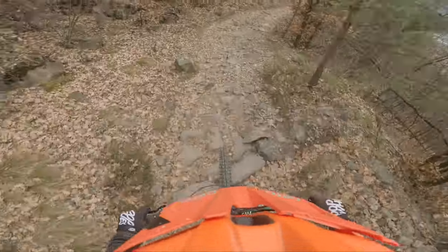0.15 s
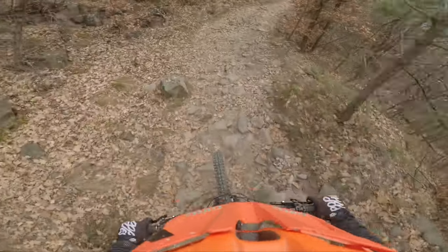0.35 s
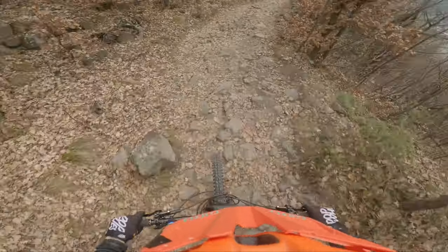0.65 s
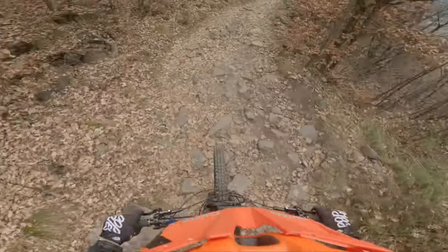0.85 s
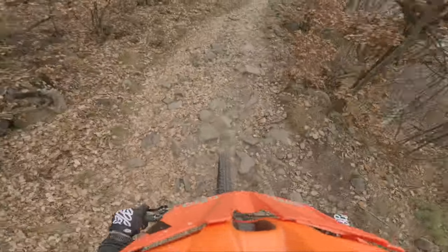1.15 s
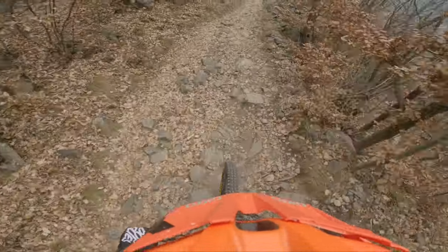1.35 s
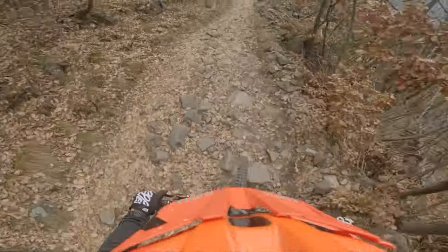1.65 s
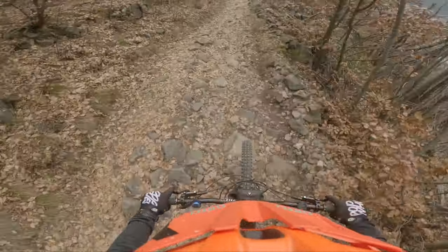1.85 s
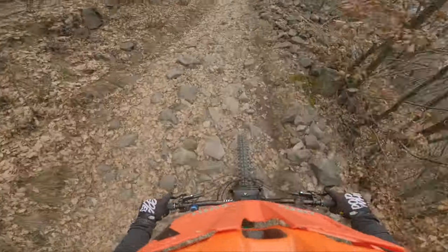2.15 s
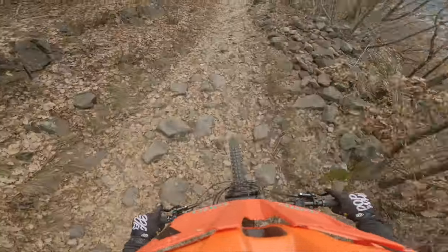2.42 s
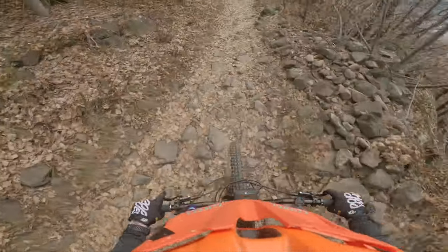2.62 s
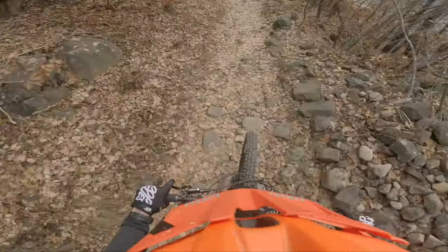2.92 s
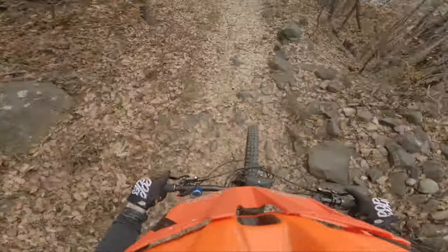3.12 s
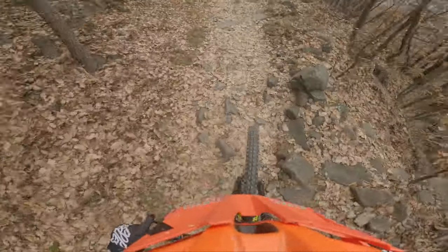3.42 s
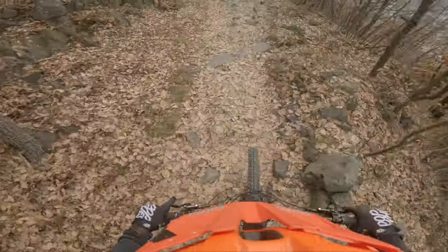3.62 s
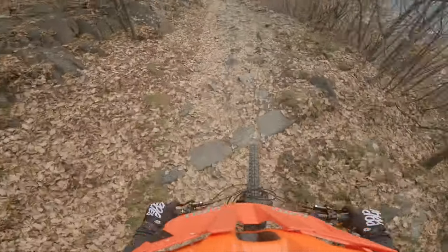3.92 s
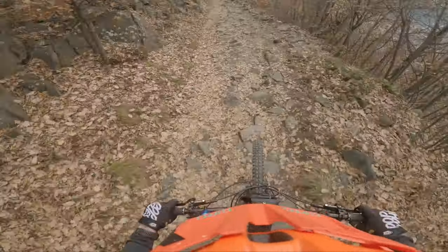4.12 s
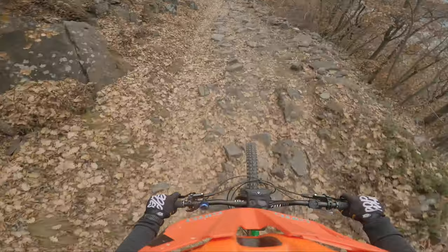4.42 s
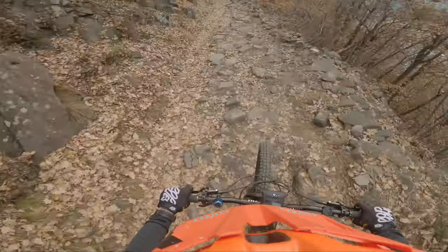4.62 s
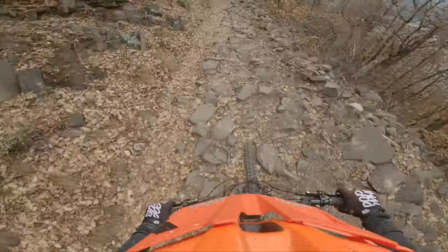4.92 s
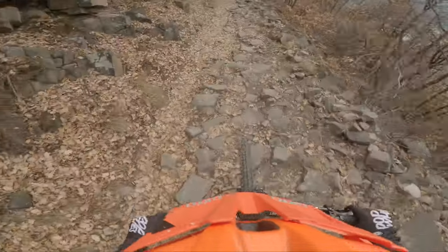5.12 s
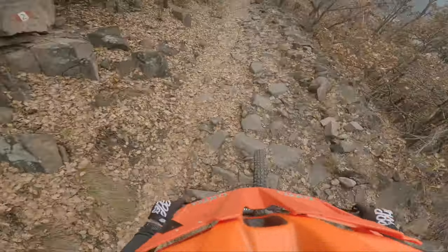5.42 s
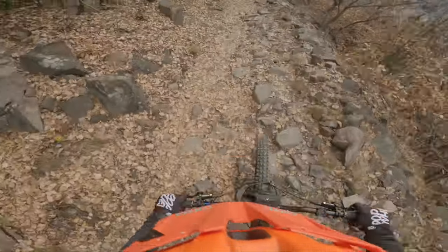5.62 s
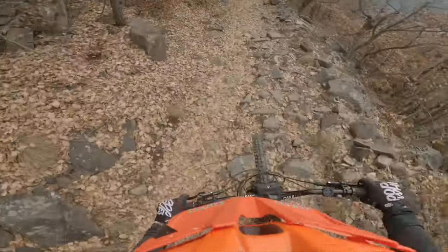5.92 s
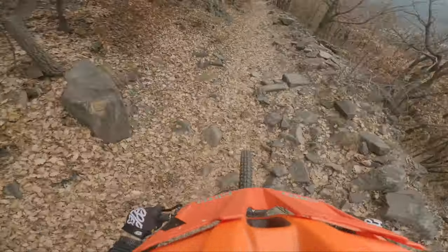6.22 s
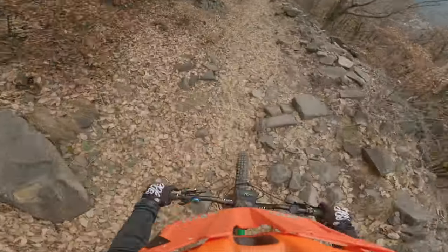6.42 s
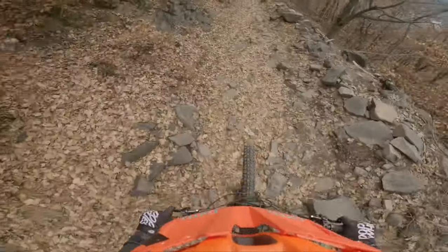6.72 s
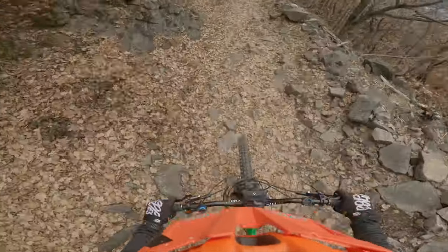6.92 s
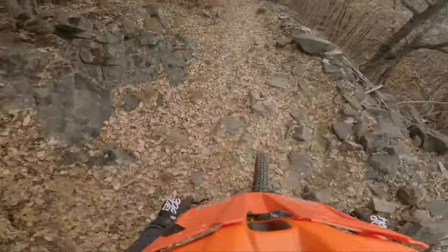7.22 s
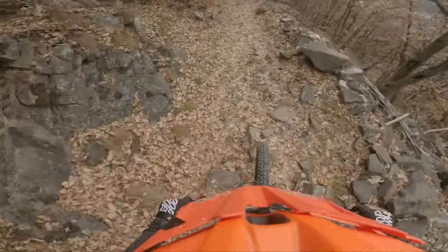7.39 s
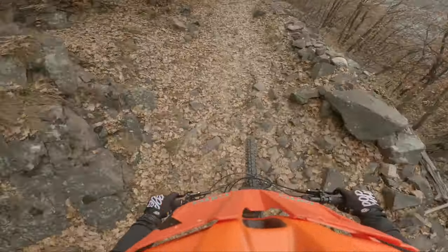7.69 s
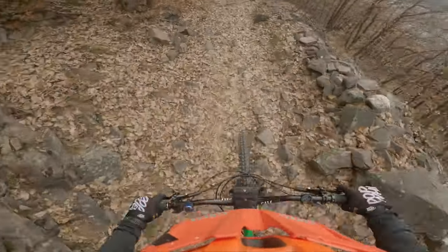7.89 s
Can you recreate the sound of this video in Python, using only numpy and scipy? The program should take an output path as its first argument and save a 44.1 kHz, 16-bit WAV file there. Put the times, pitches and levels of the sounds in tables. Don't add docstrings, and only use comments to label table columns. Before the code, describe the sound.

Heard from a rider's helmet, a mountain bike descends a rocky trail in leafless woods. Knobby tyres crunch grit and dry leaves in uneven clumps. Loose parts clack on the frame several times a second, stones knock hollowly, the slack chain clicks and rings thinly. Low wind pushes and flutters on the microphone, strongest after the middle. Close, dry outdoor sound with almost no echo.

```python
import sys
import numpy as np
from scipy import signal
from scipy.fft import rfft, irfft, next_fast_len
from scipy.io import wavfile
from scipy.ndimage import uniform_filter1d, map_coordinates

SR = 44100
rng = np.random.default_rng(int(sys.argv[2]) if len(sys.argv) > 2 else 0)


def linear_from_db(decibels):
    return 10 ** (np.asarray(decibels, float) / 20)


def inscribe(sig):
    pcm = np.round(np.clip(np.atleast_2d(sig).T, -1, 1) * 32767)
    wavfile.write(sys.argv[1], SR, pcm.astype(np.int16))


N = 355137


def unit(x):
    return x / np.sqrt(np.mean(x ** 2) + 1e-20)


def along(points, hz):
    f, v = np.transpose(points)
    return np.interp(np.log(hz + 1), np.log(f + 1), v)


def curves(rows):
    s, *cols = np.transpose(rows)
    return [np.interp(np.arange(N) / SR, s, c) for c in cols]


def swells(rows):
    t = np.arange(N) / SR
    tracks = np.zeros((len(rows[0]) - 2, N))
    for s, half_s, *db in rows:
        first = max(round((s - 4 * half_s) * SR), 0)
        near = slice(first, round((s + 4 * half_s) * SR))
        bell = np.exp(-((t[near] - s) / half_s) ** 2 / 2)
        tracks[:, near] += np.outer(db, bell)
    return tracks


def wobble(rate):
    knots = rng.standard_normal(int(N * rate / SR) + 4)
    return map_coordinates(knots, [np.arange(N) * rate / SR])


def coloured(x, spectrum):
    m = 2 * next_fast_len(N // 2 + 4096)
    gain = linear_from_db(along(spectrum, np.fft.rfftfreq(m, 1 / SR)))
    cep = irfft(np.log(gain + 1e-6), m)
    cep[1:m // 2] *= 2
    cep[m // 2 + 1:] = 0
    return unit(irfft(rfft(x, m) * np.exp(rfft(cep)), m)[:N])


def even(x, span_s):
    power = uniform_filter1d(x ** 2, size=round(span_s * SR))
    return unit(x / np.sqrt(np.abs(power) + 1e-9))


def patchy(x, depth_db):
    z = signal.stft(x, nperseg=256)[2]
    field = uniform_filter1d(rng.standard_normal(z.shape), size=5, axis=0)
    field = uniform_filter1d(field, size=7, axis=1)
    return unit(signal.istft(z * linear_from_db(depth_db * unit(field)), nperseg=256)[1][:N])


def grains(rate, centre_hz, octaves, cycles, spread_db):
    when, pitch, size = rng.random((3, int(rate * N / SR), 1))
    hz = centre_hz * 2 ** (octaves * (2 * pitch - 1))
    k = np.arange(96)
    turns = hz * k / SR
    ring = np.sin(2 * np.pi * turns) * np.exp(-turns / cycles)
    onset = 1 - np.exp(-10 * turns)
    wave = ring * onset * linear_from_db(-spread_db * np.log(size + 0.07))
    place = (when * N).astype(int) + k
    return unit(np.bincount(place.ravel(), wave.ravel(), minlength=N)[:N])


def add(track, s, sound):
    part = track[round(s * SR):][:len(sound)]
    part += sound[:len(part)]


def contact(length_s, rattle, rattle_s):
    t = np.arange(SR // 16) / SR
    wait, weaker = rng.random(2)
    since_bounce = np.abs(t - 0.003 - 0.0034 * wait)
    rough = 0.5 * np.exp(-t / length_s)
    rough += 0.47 * weaker * np.exp(-since_bounce / length_s)
    rough += rattle * np.exp(-t / rattle_s)
    return 0.83 * (t == 0) + rough * rng.standard_normal(len(t)) / np.sqrt(length_s * SR)


def resonate(x, modes, soft_hz):
    m = next_fast_len(len(x) + 2048)
    f = np.fft.rfftfreq(m, 1 / SR)
    body = 0
    for k, (hz, wide, db) in enumerate(modes):
        body = body + (-1) ** k * linear_from_db(db) * 1j * f / (hz * hz - f * f + 1j * f * wide)
    softened = body / (1 + 1j * f / soft_hz) ** 3
    return irfft(rfft(x, m) * softened * SR / (2 * np.pi), m)[:len(x)]


def struck(modes):
    scatter_db = 2.8
    return [(hz, wide, db + scatter_db * rng.standard_normal()) for hz, wide, db in modes]


def shaking(hits, rise_s, fall_s):
    load = np.zeros(N)
    t = np.arange(SR // 8) / SR
    for s, db, *_ in hits:
        add(load, s, linear_from_db(db + 11.0) * np.minimum(t / rise_s, 1) * np.exp(-t / fall_s))
    return load


# f/Hz, level/dB (per Hz)
GRIT_COLOUR = [(210, -10), (350, 0.5), (791, -5), (1110, 1.5), (1590, -0.5), (1920, -5), (2410, -1.5),
               (3650, -11), (4930, -24), (7000, -49), (9100, -56), (15400, -120)]
# f/Hz, level/dB (per Hz)
LEAF_COLOUR = [(1500, -21.5), (3500, -4), (5000, -2), (6500, -8), (8300, -10.5), (8900, -18),
               (11500, -24.5), (13500, -42), (15500, -89)]
# t/s, crunch level/dB, leaf level/dB (against the crunch)
GROUND_COVER = [(0.0, -31.5, -25.5), (0.73, -32, -23.5), (1.46, -28, -22.5), (2.2, -31.5, -24),
                (2.93, -26, -22), (3.66, -27.5, -22), (4.39, -32, -22), (5.12, -31.5, -24.5),
                (5.85, -29.5, -21.5), (6.59, -27.5, -21), (7.32, -30, -22), (8.05, -28, -18.5)]
# t/s, half length/s, change/dB
LOOSE_PATCHES = [(0.055, 0.018, 7.5), (0.394, 0.01, 6), (0.539, 0.03, -6.5), (0.913, 0.015, 2.5),
                 (1.093, 0.015, -2.5), (1.202, 0.011, -12), (1.402, 0.01, -11), (1.916, 0.061, 1),
                 (2.025, 0.025, 4), (2.544, 0.014, -4.5), (2.943, 0.042, -4), (3.083, 0.08, -5.5),
                 (3.432, 0.016, -8), (4.086, 0.018, 7), (4.46, 0.013, 2), (4.664, 0.028, 4),
                 (5.158, 0.0087, -5), (5.627, 0.027, 3), (5.832, 0.037, -8), (6.066, 0.0089, -9),
                 (6.246, 0.017, -6.5), (6.376, 0.017, -5.5), (6.575, 0.023, -13), (6.71, 0.015, -6),
                 (6.854, 0.018, -10.5), (6.914, 0.0068, -10), (7.089, 0.014, -15.5), (7.862, 0.042, -5)]
# t/s, change/dB
CRUNCH_RIPPLES = [(3.883, 0), (0.154, 5), (0.424, 7), (0.543, 4), (0.618, 1), (0.964, -3.5), (1.072, -8),
                  (3.163, 7), (1.281, -5), (1.482, -2.5), (1.521, -10.5), (1.704, -7), (1.869, -1.5),
                  (1.965, 5), (2.163, -5), (4.378, -4.5), (3.03, 0), (3.409, -3), (3.569, 2), (3.639, -11),
                  (3.819, 0), (4.001, -4), (4.085, -2), (4.259, -0.5), (4.303, 4), (4.426, 5), (4.491, -7),
                  (4.547, -2), (4.8, 2.5), (4.768, -6), (4.838, -6), (4.971, 3.5), (5.27, -4), (5.372, -1),
                  (5.511, -1.5), (5.566, 0), (5.669, -11), (5.041, 0), (6.495, -8), (6.635, -6.5),
                  (6.795, 1.5), (7.014, -3.5), (7.157, -4), (7.334, 3.5), (7.466, 0.5), (7.737, 1),
                  (7.844, 5), (7.895, 3), (8.011, 0)]
# t/s, change/dB
LEAF_RUSTLES = [(0.28, 11), (0.574, 11), (0.815, 6), (0.952, 13), (1.864, 6), (3.161, 3), (4.124, 8),
                (4.674, 11.5), (5.184, 7), (7.577, 7), (7.976, 8)]


def tyres(dull):
    load = shaking(dull + STONE_THUMPS + PEBBLE_HITS, rise_s=0.0015, fall_s=0.014)
    clump_db = 1.87 * wobble(25) + 1.9 * wobble(80)

    hiss = patchy(coloured(rng.standard_normal(N), GRIT_COLOUR), depth_db=3.0)
    stones = grains(700, centre_hz=1610, octaves=1.26, cycles=1.7, spread_db=4.5)
    grit = even(linear_from_db(clump_db) * (hiss + 0.68 * stones), span_s=0.089)

    snaps = grains(1500, centre_hz=7900, octaves=1.74, cycles=1.0, spread_db=-4.0)
    crackle = coloured(rng.standard_normal(N) + 0.51 * snaps, LEAF_COLOUR)
    leaves = unit(linear_from_db(0.89 * clump_db + 2.2 * wobble(30)) * crackle)

    crunch_db, cover_db = curves(GROUND_COVER)
    ripples = [(s, 0.0082, db) for s, db in CRUNCH_RIPPLES]
    patch_db, = swells(LOOSE_PATCHES + ripples)
    rustle_db, = swells([(s, 0.004, db) for s, db in LEAF_RUSTLES])
    near_leaves = linear_from_db(0.83 * patch_db + rustle_db)
    cover = (near_leaves + 0.28) * (1 + 0.15 * load)

    grit_level = linear_from_db(crunch_db + patch_db - 3.0) * (1 + 1.38 * load)
    return grit_level * grit + linear_from_db(crunch_db + cover_db + 4) * cover * leaves


# t/s, level/dB
AIRFLOW = [(0.0, -29.5), (0.89, -26.5), (1.79, -28.5), (2.68, -24.5), (3.58, -27), (4.47, -18.5),
           (5.37, -19), (6.26, -24.5), (7.16, -24), (8.05, -26)]
# f/Hz, level/dB (per Hz)
BUFFET_COLOUR = [(10, -13), (30, -1), (60, 2.5), (110, -4), (170, -17), (300, -37.5), (700, -73.5)]
# f/Hz, level/dB (per Hz)
FLUTTER_COLOUR = [(60, -11), (120, 2.5), (220, -3), (330, -12.5), (500, -26), (900, -38), (2000, -99)]
# t/s, half length/s, push/dB, flutter/dB
WIND_GUSTS = [(0.08, 0.022, 7, 14), (0.683, 0.014, 9.5, 9.5), (0.738, 0.012, -13, -15),
              (0.793, 0.072, 7.5, 14), (0.988, 0.082, -4.5, -2), (1.217, 0.019, 5.5, 15),
              (1.541, 0.031, -5.5, -2.5), (1.866, 0.017, -22, -2), (2.03, 0.022, -15, 6.5),
              (2.684, 0.041, -9, -0.5), (2.948, 0.04, -4, -0.5), (3.751, 0.027, -8, 6),
              (3.841, 0.027, -12, 0), (4.071, 0.026, 4, 8), (4.185, 0.024, 3.5, 14.5),
              (5.098, 0.024, -10, -10), (5.198, 0.029, -8, -8.5), (5.557, 0.096, 2, -12),
              (5.687, 0.021, -3.5, -15), (5.802, 0.084, -1, 7), (6.016, 0.014, -6, -11),
              (6.221, 0.027, 5.5, 1), (6.346, 0.014, 6.5, 16.5), (6.62, 0.022, 3.5, 5),
              (6.944, 0.04, 5.5, 6), (7.019, 0.037, -11, -7), (7.423, 0.024, -4, -11), (7.603, 0.021, 5, 7)]
# t/s, push/dB, flutter/dB
WIND_EDDIES = [(0.112, 0, -9), (0.62, -7, -8), (0.895, 5.5, 8), (0.959, -3, -10), (1.443, 0, 13),
               (1.496, -8, 4), (1.69, 2.5, -6), (1.762, -7, 9), (2.116, 5.5, 6), (2.243, -2, 9),
               (2.294, -1.5, 7.5), (2.472, -12, 0), (4.415, -5, 7.5), (2.775, 4.5, 7), (7.07, 1, 7),
               (3.618, -13, 5), (3.78, 11, -11), (3.976, -10, 3), (4.325, -7, 5.5), (4.499, 0, -4.5),
               (4.636, -3, 7.5), (4.747, -6, 1.5), (4.92, -4, 8), (5.22, 5, 6), (5.459, -4, 13),
               (5.609, -2, 8.5), (5.785, 4, 1), (5.86, 3.5, -13), (5.928, 3, 5), (6.219, -3, 9),
               (6.482, 0.5, -1), (6.842, 1.5, -2), (6.97, -9, 2), (7.14, 8.5, -1), (7.294, 3.5, -18),
               (7.549, 8, -5), (7.685, 5.5, -7), (7.835, 6, 4.5), (7.95, 5.5, -12), (8.048, 2.5, -7)]


def wind():
    air_db, = curves(AIRFLOW)
    mean_db = air_db.mean()
    eddies = [(s, 0.012, push, whip) for s, push, whip in WIND_EDDIES]
    push_db, whip_db = swells(WIND_GUSTS + eddies)
    lumps = wobble(16)
    buffet = linear_from_db(1.04 * lumps) * coloured(rng.standard_normal(N), BUFFET_COLOUR)
    buffet = even(buffet, span_s=0.15)
    flutter = linear_from_db(1.3 * lumps + 3.8 * wobble(35)) * coloured(rng.standard_normal(N), FLUTTER_COLOUR)
    flutter = even(flutter, span_s=0.16)
    buffet_db = mean_db + 0.76 * (air_db - mean_db) + push_db + 0.6
    flutter_db = -31 + 1.13 * (air_db - mean_db) + whip_db
    return linear_from_db(buffet_db) * buffet + linear_from_db(flutter_db) * flutter


# t/s, dull level/dB, hard level/dB
FULL_STRIKES = [(1.049, -17, -34), (1.223, -14.5, -29), (1.6834, -11, -20.5), (1.7447, -18.5, -26),
                (1.766, -16, -23), (2.073, -13, -21), (2.1153, -18, -38), (2.2035, -22, -31.5),
                (2.423, -18, -20.5), (2.7518, -17, -39), (3.1723, -15.5, -27), (3.27, -19, -32.0),
                (3.2956, -33, -19), (3.3942, -15, -42), (3.5157, -14, -30), (3.6236, -13, -20),
                (3.71, -15, -41), (3.7754, -18, -25), (3.8293, -20, -37), (4.459, -15.5, -17.5),
                (5.93, -25, -30), (6.4287, -12, -20), (6.4708, -17, -18), (6.5429, -8, -21),
                (7.0634, -10.5, -26), (7.283, -20, -45), (7.375, -17.5, -26), (7.589, -17.5, -21),
                (7.9382, -19, -24.5), (7.978, -16, -27)]
# t/s, peak level/dB
DULL_CLACKS = [(0.1, -18), (0.3788, -19), (0.7163, -18), (0.9825, -17.5), (1.1853, -12), (1.833, -21),
               (2.05, -15), (2.131, -16.5), (2.489, -12), (2.5772, -17), (2.667, -13), (2.848, -16.5),
               (2.975, -16), (3.107, -15.5), (4.5575, -23), (4.076, -15.5), (4.1614, -20), (4.939, -20),
               (5.359, -10), (5.4686, -17.5), (5.645, -14.5), (6.1304, -17.5), (6.183, -18.5),
               (6.2724, -17.5), (6.5306, -14), (6.619, -16.5), (6.696, -15), (6.7645, -17), (6.8322, -12.5),
               (6.953, -16.5),
               (0.357, -17.5), (0.607, -18.5), (0.6787, -21), (0.826, -24), (0.93, -28), (1.4333, -21),
              (1.582, -19), (1.665, -16.5), (2.348, -21), (2.396, -21), (3.338, -22.5), (4.6565, -20),
              (4.722, -17.5), (4.819, -23), (4.9038, -24), (5.297, -23), (5.439, -19), (5.913, -17),
              (6.0856, -23), (7.1057, -18), (7.164, -24), (7.267, -29)]
# t/s, peak level/dB
HARD_SNAPS = [(0.0199, -32), (0.342, -32), (0.4904, -26), (1.1857, -28), (1.3833, -29), (1.497, -22),
              (1.5505, -25), (1.608, -19.5), (2.0137, -24.5), (2.1382, -16.5), (0.2125, -31),
              (2.2536, -27.5), (2.805, -20.5), (3.1073, -20), (3.9537, -22.5), (4.3243, -28.5),
              (4.9423, -23), (5.22, -23.5), (5.615, -23), (5.6441, -31), (5.733, -24), (5.85, -34),
              (5.899, -21.5), (6.004, -27), (6.324, -19.5), (6.5974, -24), (6.771, -23.5), (7.1333, -21.5),
              (7.177, -29), (7.912, -32)]


def strikes():
    knocks = [(s, db + 1.0) for s, db, *_ in FULL_STRIKES + DULL_CLACKS]
    return knocks + [(s, db + 4) for s, db in HARD_SNAPS]


# f/Hz, width/Hz, level/dB
FRAME_MODES = [(1500, 480, -2), (2370, 177, 0.5), (2750, 320, 4), (3330, 560, 1.5)]
# f/Hz, width/Hz, level/dB
FRAME_TOP_MODES = [(3944, 200, -1), (5350, 600, -0.5), (7500, 2500, -30)]


def clacks(dull):
    track = np.zeros(N)
    for s, db in dull:
        blow = contact(0.0011, rattle=0.32, rattle_s=0.0053)
        knock = resonate(blow, struck(FRAME_MODES), soft_hz=3850)
        add(track, s, linear_from_db(db) * knock / np.abs(knock).max())
    for s, db in HARD_SNAPS + [(s, db + 1.0) for s, _, db in FULL_STRIKES]:
        blow = contact(0.00037, rattle=0.24, rattle_s=0.0013)
        snap = resonate(blow, struck(FRAME_TOP_MODES), soft_hz=5150)
        add(track, s, linear_from_db(db + 2.0) * snap / np.abs(snap).max())
    return track


# t/s, peak level/dB
TWIG_SNAPS = [(0.0199, -16), (0.0997, -17), (0.7177, -9), (0.847, -21), (0.8654, -17), (0.931, -15.5),
              (1.771, -11), (1.7953, -18), (1.8315, -11.5), (2.178, -20), (2.676, -13), (2.7508, -13),
              (3.6521, -17), (3.7559, -11), (3.8302, -6), (5.7468, -15), (5.8102, -20), (5.9309, -11),
              (6.12, -11), (7.4245, -13), (7.9194, -14)]
# f/Hz, width/Hz, level/dB
TWIG_MODES = [(3000, 450, 1.5), (5440, 2500, -8)]


def twigs():
    track = np.zeros(N)
    t = np.arange(SR // 100) / SR
    for s, db in TWIG_SNAPS:
        crack = np.exp(-t / 0.00047) * rng.standard_normal(len(t))
        click = resonate(crack, TWIG_MODES, soft_hz=6000)
        add(track, s, linear_from_db(db - 5) * click / np.abs(click).max())
    return track


# t/s, peak level/dB, f/Hz
STONE_THUMPS = [(0.04, -19.5, 950), (0.38, -22, 950), (0.682, -16.5, 1250), (0.827, -17, 1250),
                (0.899, -16, 1080), (1.058, -12, 1010), (1.13, -20.5, 1200), (1.235, -20, 1050),
                (1.5, -21, 1420), (1.897, -16.5, 1380), (2.253, -17.5, 1000), (2.577, -20, 1170),
                (2.636, -19.5, 1490), (3.037, -9, 1040), (3.254, -17, 1200), (3.344, -17, 1170),
                (3.7565, -17, 1000), (4.036, -19, 1110), (4.636, -17.5, 980), (4.983, -13.5, 1060),
                (5.229, -18.5, 1080), (5.649, -16, 1210), (5.724, -20, 1110), (5.841, -18, 1020),
                (6.089, -14, 890), (6.474, -20, 1100), (6.617, -17, 1370), (6.947, -15.5, 1070),
                (7.696, -18, 1190), (7.776, -18.5, 1070)]
# t/s, peak level/dB
WHEEL_DROPS = [(0.68, -19.5), (0.767, -14), (1.302, -18), (2.028, -17.5), (3.268, -21.5), (3.755, -13),
               (4.158, -18), (4.21, -11), (4.684, -16), (4.803, -21), (5.33, -20), (5.794, -13.5),
               (6.338, -23)]
# f/Hz, width/Hz, level/dB
FORK_MODES = [(127, 210, -3), (260, 78, 2.5), (560, 520, 3), (880, 590, -3)]


def thumps():
    track, drops = np.zeros((2, N))
    for s, db, hz in STONE_THUMPS:
        shell = [(0.25 * hz, 300, -9), (hz, 300, 2.5), (1.87 * hz, 600, -2.5)]
        blow = contact(0.00037, rattle=0.5, rattle_s=0.0083)
        add(track, s, linear_from_db(db + 0.5) * resonate(blow, shell, soft_hz=3740))
    for s, db in WHEEL_DROPS:
        add(drops, s, linear_from_db(db + 4.0) * contact(0.0015, rattle=0.26, rattle_s=0.015))
    return track + resonate(drops, FORK_MODES, soft_hz=3000)


# t/s, ring level/dB, click level/dB
CHAIN_SLAPS = [(0.39, -52, -27), (0.619, -51, -35), (0.708, -49, -31), (0.755, -50, -31), (0.837, -53, -31),
               (0.9159, -45, -30), (0.994, -42, -29), (1.1272, -48, -33), (1.248, -45, -24),
               (1.9016, -41, -26.5), (2.585, -46, -26.5), (2.708, -46, -29), (2.849, -53, -29.5),
               (2.9876, -46, -30), (3.202, -47, -26.5), (3.2584, -46, -31), (3.5408, -52, -33),
               (3.6844, -46, -28.5), (3.7958, -52, -44), (4.1982, -45, -32), (4.476, -52, -32),
               (5.2372, -51, -29.5), (5.367, -51, -29.5), (5.918, -45, -29), (6.657, -52, -26.5),
               (6.8084, -45, -30), (6.952, -50, -28), (7.2956, -47, -31), (7.393, -47, -32.5),
               (7.655, -42, -28)]
# t/s, ring level/dB
CHAIN_TICKS = [(0.0535, -44), (0.1226, -48), (1.3423, -45.5), (1.3876, -43.5), (2.1884, -44.5),
               (2.4974, -42.5), (2.6678, -47), (2.817, -49), (3.049, -46), (3.1123, -50), (3.3568, -52),
               (3.412, -50), (3.4675, -50), (3.9639, -50), (4.325, -49), (4.5221, -48), (4.575, -49),
               (4.664, -46), (4.7416, -47.5), (4.9438, -48), (5.0757, -48.5), (5.3156, -48), (5.4615, -43),
               (5.657, -41), (5.7327, -47), (5.854, -40), (6.0344, -45.5), (6.4606, -41), (7.179, -40.5),
               (7.9114, -44)]
# f/Hz, width/Hz, level/dB
LINK_MODES = [(8970, 170, 4.5), (15000, 300, -3)]
# f/Hz, width/Hz, level/dB
CLICK_MODES = [(4780, 790, 9.5), (7300, 3000, -15), (10000, 2500, -26)]


def chain():
    links, clicks = np.zeros((2, N))
    slaps = [(s, ring_db + 8.1, click_db + 5) for s, ring_db, click_db in CHAIN_SLAPS]
    ticks = [(s, db, db + 17.0) for s, db in CHAIN_TICKS]
    for s, ring_db, click_db in slaps + ticks:
        add(links, s, linear_from_db(ring_db + 0.5) * contact(0.00013, rattle=0.11, rattle_s=0.0097))
        add(clicks, s, linear_from_db(click_db) * contact(0.00051, rattle=0.54, rattle_s=0.0048))
    ring = resonate(links, LINK_MODES, soft_hz=30000)
    return ring + resonate(clicks, CLICK_MODES, soft_hz=6950)


# t/s, peak level/dB, f/Hz
PEBBLE_HITS = [(1.439, -21, 480), (0.141, -24, 4050), (0.159, -21, 2360), (2.43, -20, 503),
               (4.589, -27, 510), (1.304, -21, 960), (1.425, -21, 1720), (1.651, -19.5, 620),
               (5.298, -21, 480), (1.959, -23, 1150), (1.958, -25, 1530), (2.026, -18, 1550),
               (2.11, -19.5, 675), (2.202, -19, 1050), (2.217, -21, 650), (4.51, -26, 520),
               (7.212, -26, 474), (2.676, -24, 3800), (2.919, -18.5, 1050), (3.351, -20, 560),
               (3.031, -23, 2400), (3.032, -27, 3710), (3.562, -35, 6270), (3.598, -17, 2600),
               (3.819, -22, 1120), (3.82, -26, 1380), (3.825, -29, 3550), (3.92, -22.5, 1410),
               (3.968, -19, 1650), (4.031, -24, 2440), (4.037, -25, 516), (4.191, -15.5, 2160),
               (4.336, -21, 2360), (4.73, -18, 1460), (5.301, -29, 1250), (5.304, -24, 1790),
               (5.306, -19, 2380), (5.453, -20, 2190), (5.484, -23, 2360), (5.539, -22, 1030),
               (5.645, -31, 5060), (6.54, -25, 5500), (6.61, -19, 3540), (6.65, -18, 1100),
               (6.796, -29, 1180), (6.799, -33, 2440), (7.038, -24, 2400), (7.062, -22.5, 5460),
               (7.065, -24, 1030), (7.215, -20, 2390), (7.267, -18, 1450), (7.361, -19, 2560),
               (7.363, -26, 3830), (7.514, -22, 1150), (7.653, -16.5, 2630), (7.971, -17, 570),
               (7.765, -23, 4800), (7.898, -27, 1020)]


def pebbles():
    track = np.zeros(N)
    t = np.arange(SR // 16) / SR
    for s, db, hz in PEBBLE_HITS:
        grind = t * np.exp(-t / 0.0019) * rng.standard_normal(len(t))
        modes = [(hz, hz / 16 + 50, 0), (1.22 * hz, hz / 2.8, -9)]
        ring = resonate(grind, modes, soft_hz=9000)
        add(track, s, linear_from_db(db - 3.0) * ring / np.abs(ring).max())
    return track


# t/s, ring level/dB
FAINT_TICKS = [(1.495, -51), (1.834, -51), (5.847, -51), (6.136, -46), (6.946, -49), (7.114, -50),
               (7.574, -47), (7.647, -48), (7.969, -49)]


def faint_ticks():
    links = np.zeros(N)
    for s, db in FAINT_TICKS:
        add(links, s, linear_from_db(db + 3.0) * contact(0.0004, rattle=0.15, rattle_s=0.004))
    return resonate(links, LINK_MODES, soft_hz=30000)


# f/Hz, time to fall by 60 dB/s
TRAIL_ECHO = [(300, 0.022), (2000, 0.021), (9000, 0.017)]


def scatter(x):
    hz, t, z = signal.stft(rng.standard_normal(SR // 6), SR, nperseg=128)
    decay = linear_from_db(-60 * t / along(TRAIL_ECHO, hz)[:, None])
    tail = signal.istft(z * decay, SR, nperseg=128)[1]
    return signal.fftconvolve(x, tail / np.linalg.norm(tail))[:N]


def scene():
    dull = strikes()
    bike = clacks(dull) + thumps() + chain()
    whole = bike + linear_from_db(-23) * scatter(bike)
    whole = whole + tyres(dull) + wind() + pebbles() + faint_ticks() + twigs()
    fade_out = np.minimum(np.arange(N)[::-1] / 100, 1)
    return (whole * fade_out)[None]


def roll_off(x):
    return signal.sosfilt(signal.butter(12, 15570, fs=SR, output="sos"), x)


def record(dry):
    bent = dry / (1 + np.abs(dry / 0.6) ** 4) ** (1 / 4)
    housing = signal.butter(N=4, Wn=10500, fs=SR, output="sos")
    mix = signal.sosfilt(housing, bent)
    return roll_off(mix)


dry = scene()
out = record(dry)
inscribe(out)
```